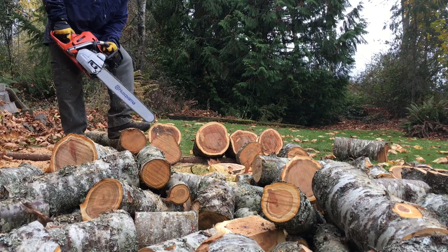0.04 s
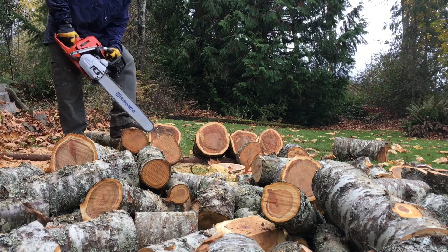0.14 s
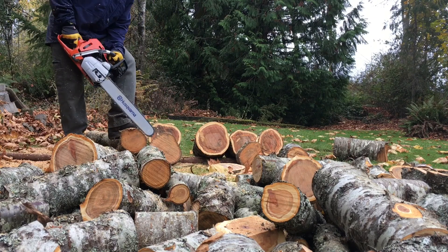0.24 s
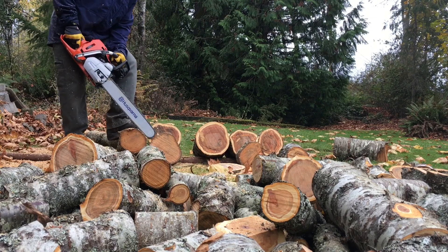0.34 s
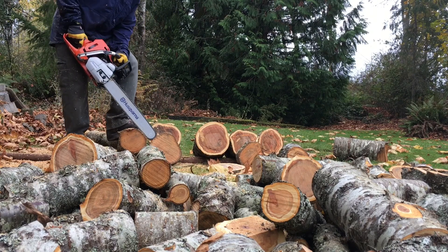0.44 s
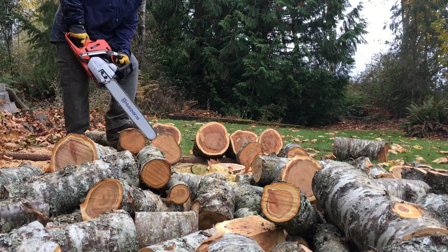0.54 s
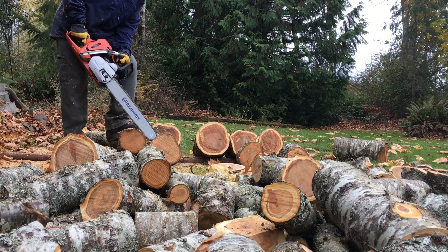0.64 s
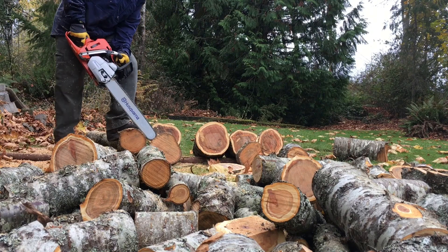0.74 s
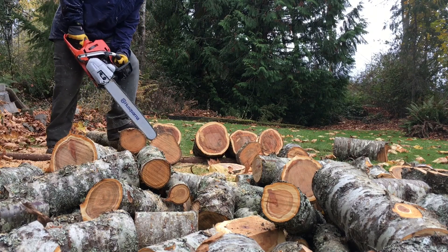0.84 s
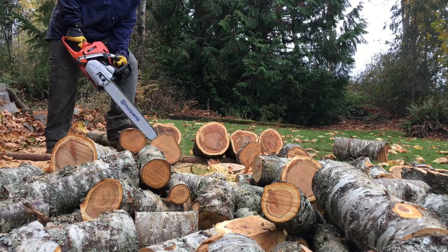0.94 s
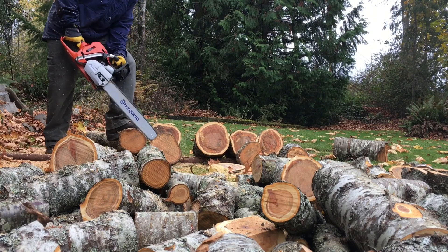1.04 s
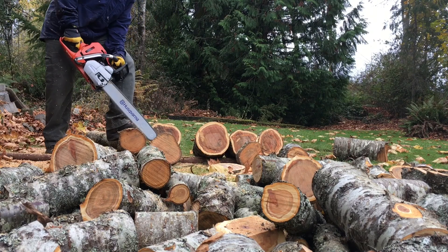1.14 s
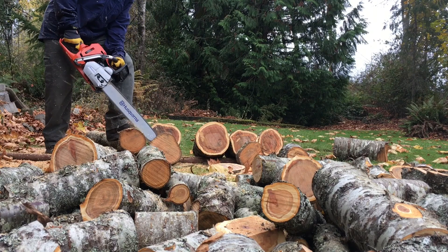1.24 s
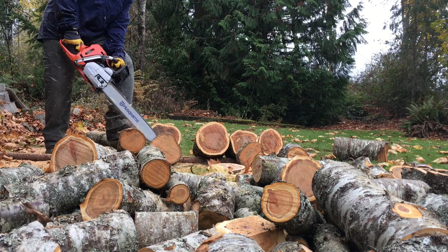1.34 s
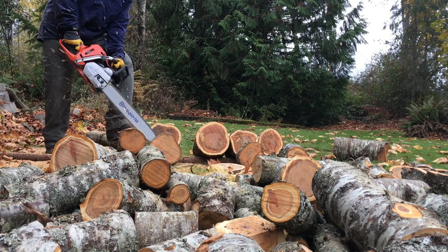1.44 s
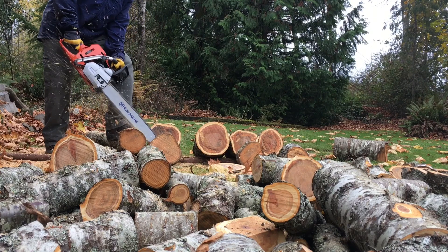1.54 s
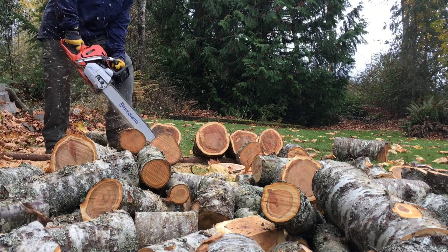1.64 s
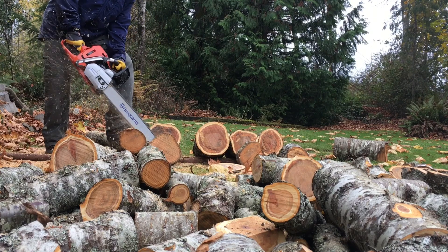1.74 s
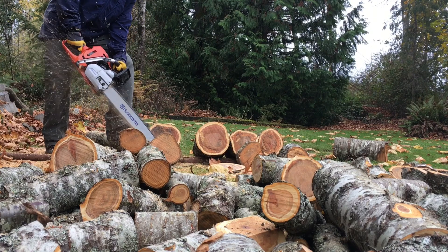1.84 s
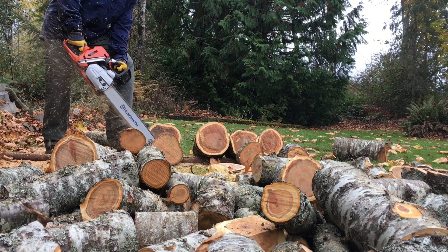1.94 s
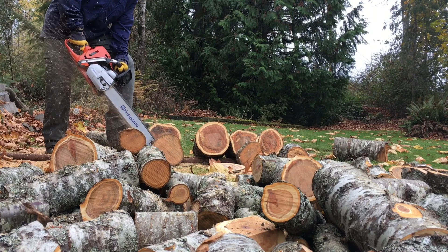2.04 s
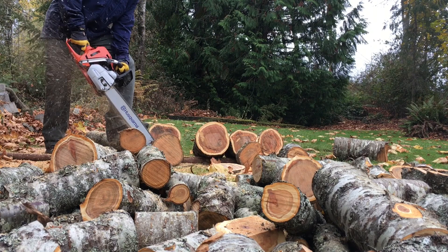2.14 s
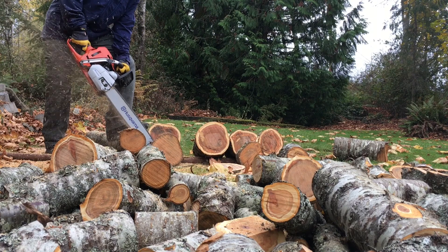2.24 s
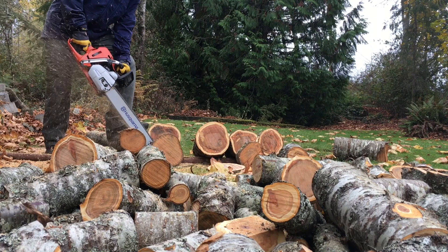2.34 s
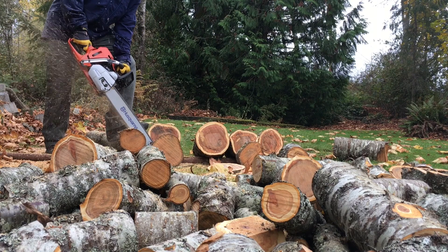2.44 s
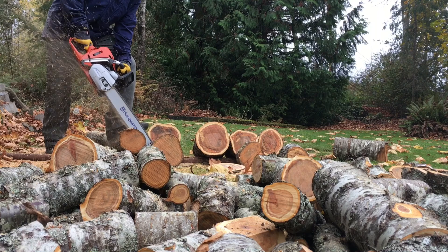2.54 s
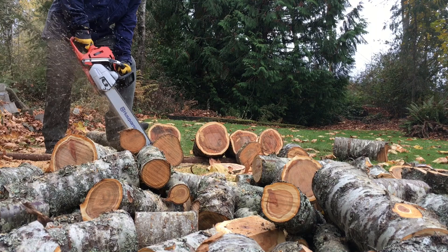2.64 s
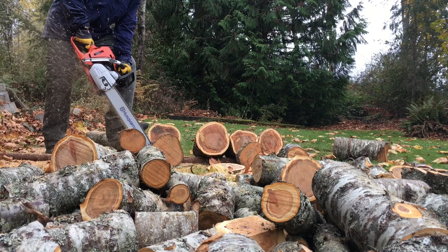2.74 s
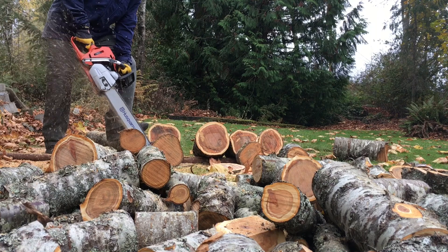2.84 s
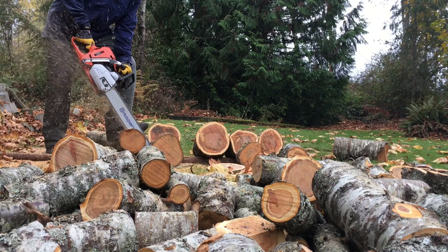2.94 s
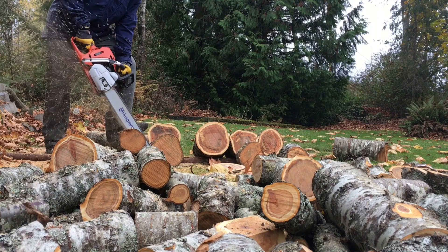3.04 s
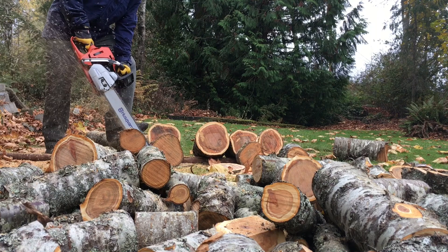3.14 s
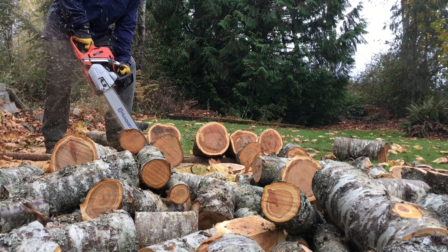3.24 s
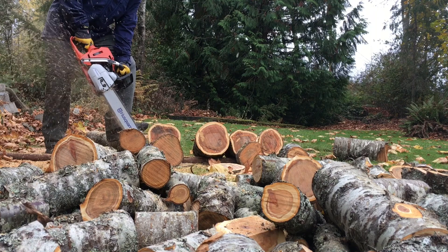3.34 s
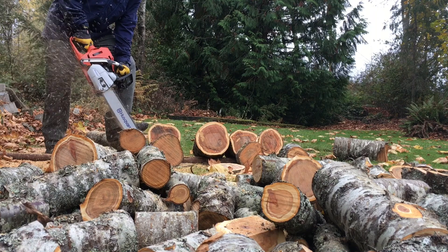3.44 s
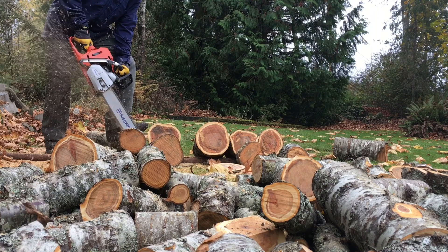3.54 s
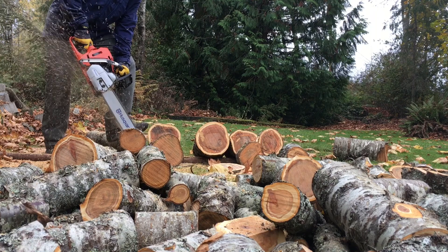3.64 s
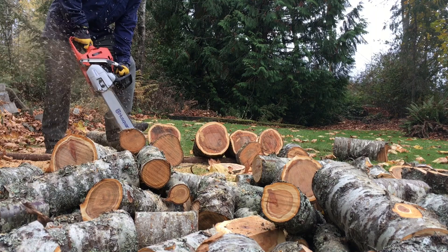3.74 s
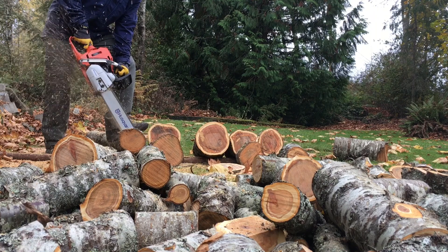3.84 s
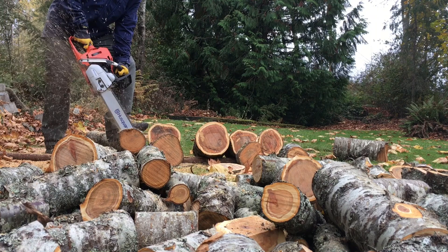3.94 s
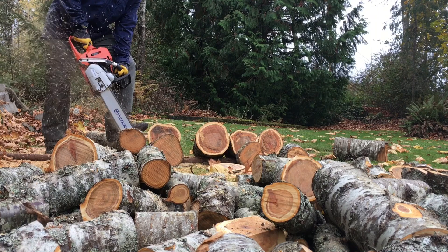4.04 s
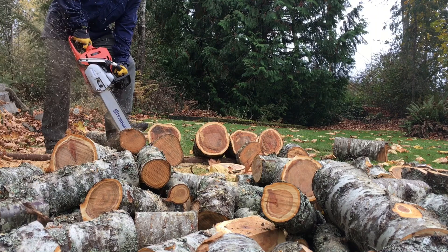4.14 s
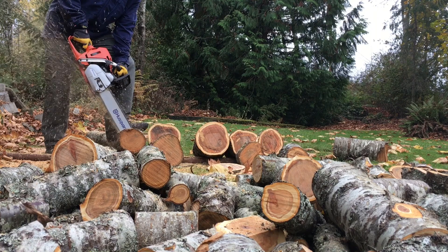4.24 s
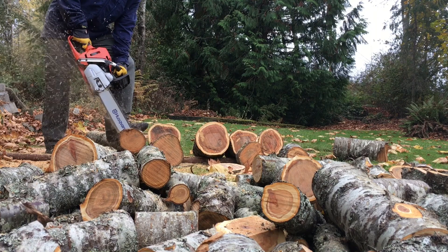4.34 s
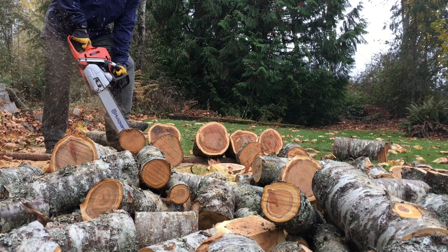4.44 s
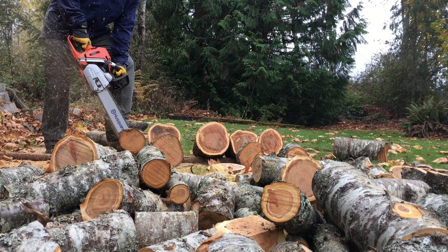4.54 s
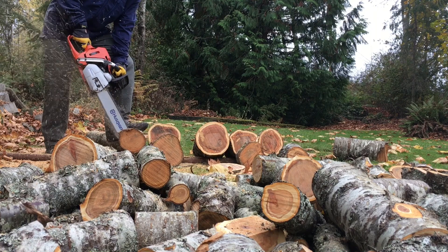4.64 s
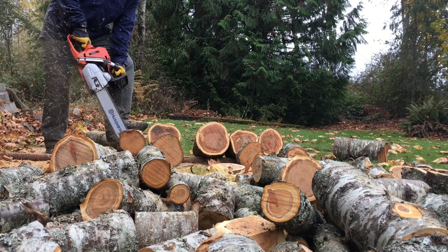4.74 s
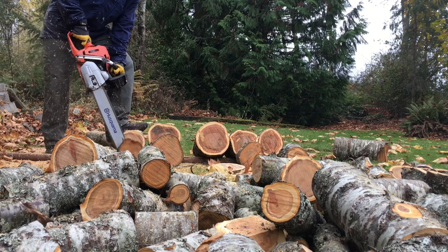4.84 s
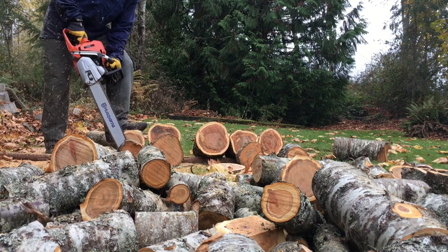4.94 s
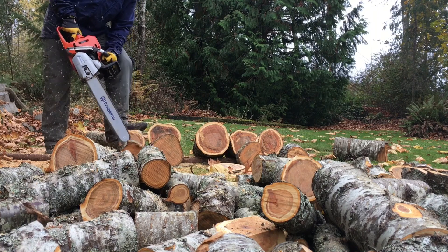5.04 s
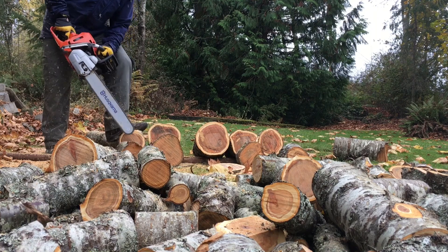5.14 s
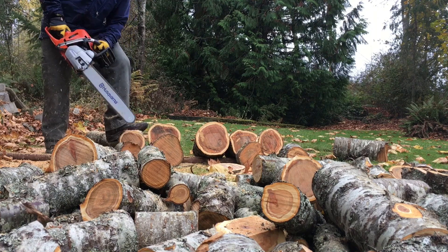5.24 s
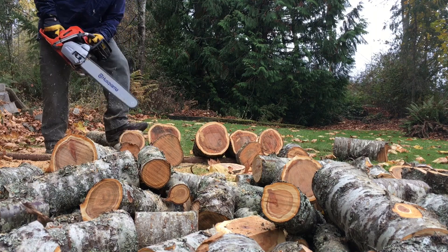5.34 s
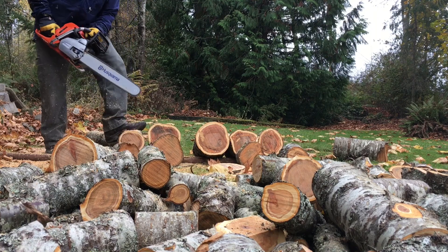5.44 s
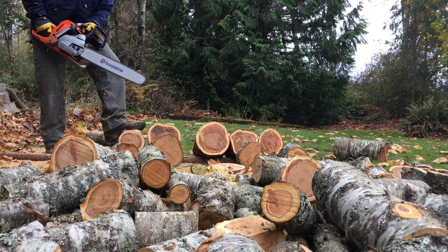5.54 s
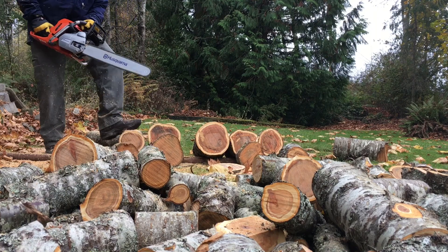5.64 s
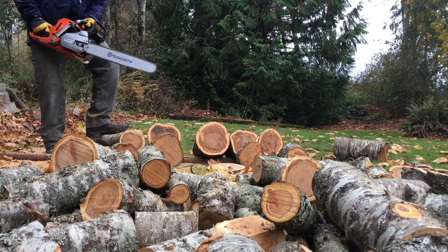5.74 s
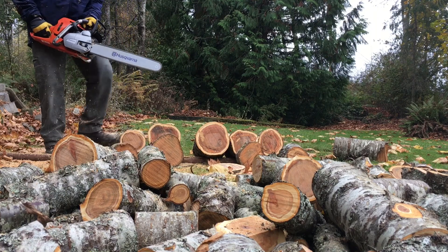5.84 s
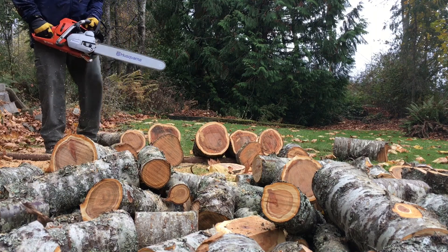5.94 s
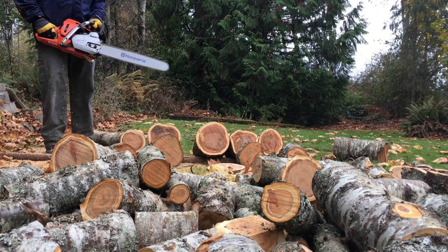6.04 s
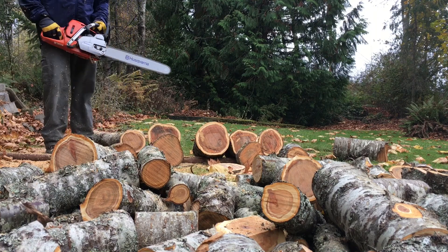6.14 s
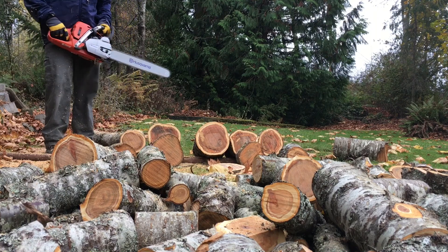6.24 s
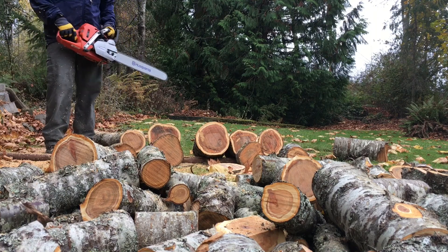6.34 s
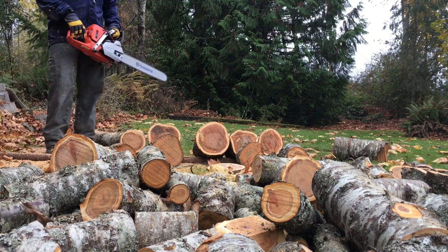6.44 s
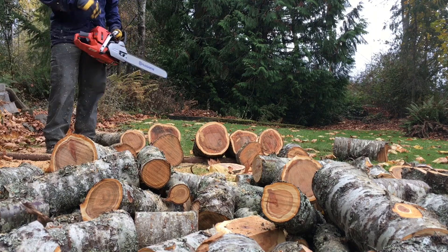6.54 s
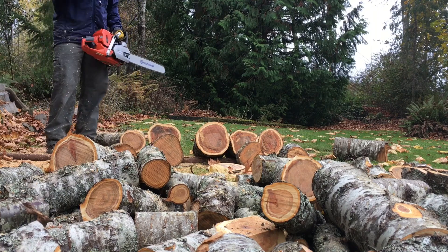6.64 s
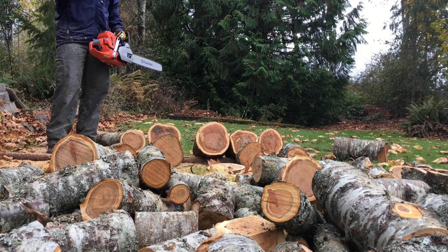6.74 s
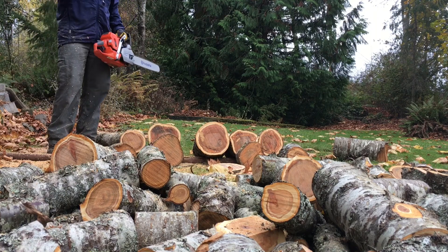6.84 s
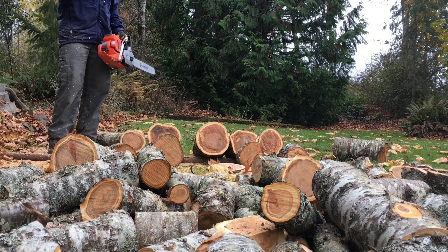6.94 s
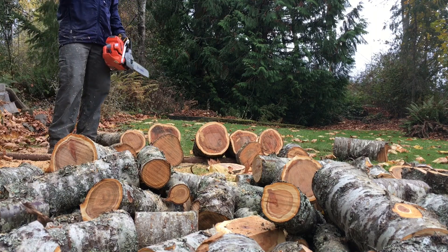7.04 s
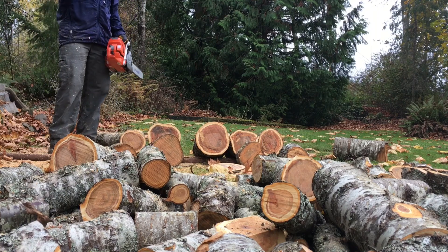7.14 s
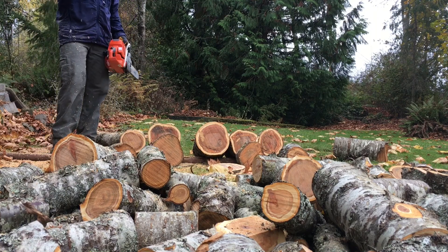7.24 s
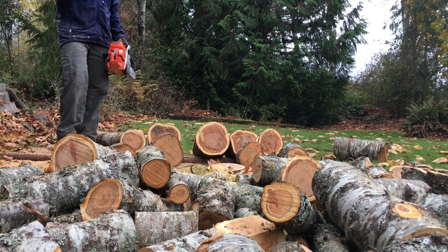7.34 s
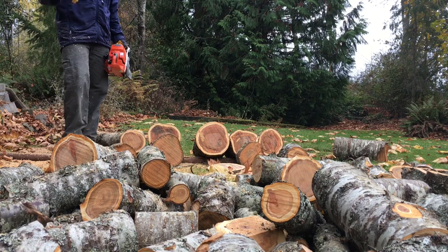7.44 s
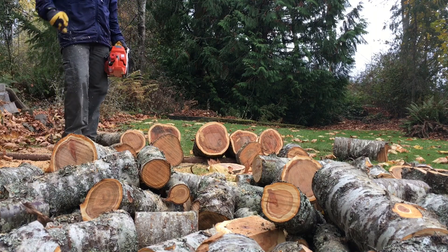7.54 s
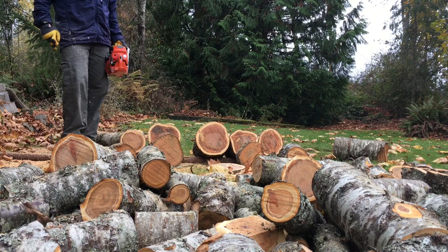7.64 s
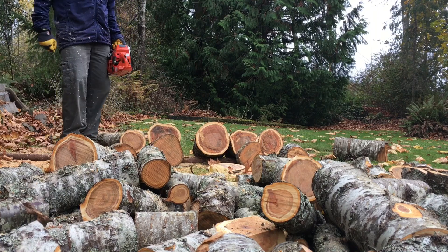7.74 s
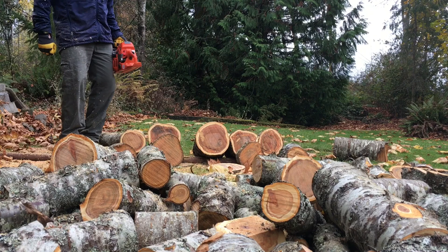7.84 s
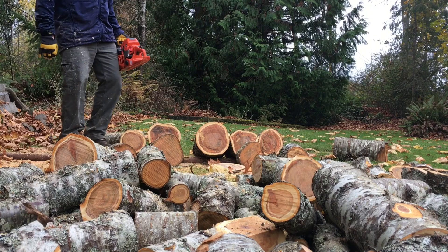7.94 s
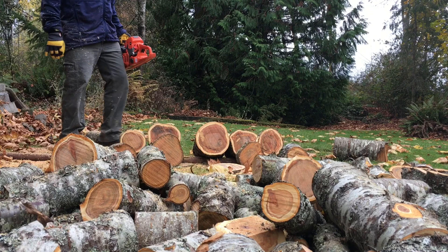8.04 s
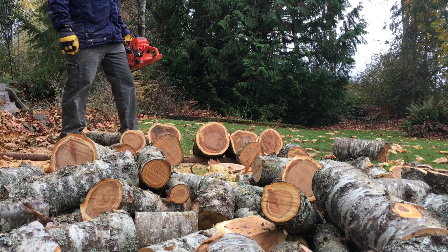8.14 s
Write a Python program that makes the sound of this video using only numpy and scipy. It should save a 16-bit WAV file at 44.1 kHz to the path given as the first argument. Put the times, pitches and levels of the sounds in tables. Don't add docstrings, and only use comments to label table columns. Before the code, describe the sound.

Close outdoor chainsaw: lumpy idle, sputtering throttle-up, loud steady high-speed cut with brief stutters, quick coast-down, then irregular popping idle moving off.

```python
import sys
import numpy as np
from scipy import signal
from scipy.fft import rfft, irfft, next_fast_len
from scipy.io import wavfile
from scipy.ndimage import uniform_filter1d, map_coordinates

SR = 44100
rng = np.random.default_rng(int(sys.argv[2]) if len(sys.argv) > 2 else 0)


def how_loud(loudness_db):
    steps = np.asarray(loudness_db, float) / 20
    return 10 ** steps


def persist_wave(psi):
    counts = np.round(np.clip(psi, -1, 1) * 32767).astype(np.int16)
    wavfile.write(sys.argv[1], SR, np.atleast_2d(counts).T)


N = 360719
TIME = np.arange(N) / SR

# [t/s, speed/turns per s]
CRANK_SPEED = [(0, 43.5), (.99, 43.5), (1.05, 78), (1.12, 89.7), (1.39, 98.8), (1.575, 167), (1.69, 200.8),
               (1.8, 216.3), (1.95, 221.3), (2.74, 221.2), (3.3, 218), (4.78, 219.5), (5.005, 232),
               (5.17, 169), (5.72, 79), (5.9, 67), (6.29, 54), (6.42, 43.5)]
# [start t/s, end t/s, loss level/dB]
LIMITER_SPELLS = [(2.07, 2.09, -7.5), (2.75, 2.854, -4.5), (3.437, 3.455, -8), (4.033, 4.163, -4),
                  (4.487, 4.517, -4.5), (4.784, 4.886, -5), (4.962, 4.996, -7)]
SAG_PER_DB, RECOVER_S = 24, .13
PULLED_S, FREED_S = 0.98, 5.0
PULL_S, RELEASE_S = 0.066, 0.061
# [t/s, level/dB]
THROTTLE_LEVEL = [(1.0, -16.5), (1.2, -12.5), (1.41, -11.5), (1.5, -7.5), (1.62, -8.5), (1.9, -12.5), (2.6, -14),
                  (5.0, -13.5)]
# [t/s, level/dB]
CARRIED_OFF = [
    (6.2, 0),
    (7.0, -1.5),
    (8.18, -2),
]

# [t/s, peak level/dB]
IDLE_POPS = [(0.015, -19), (0.085, -15.5), (0.152, -15.5), (0.195, -18.5), (0.262, -16.5), (0.327, -20),
             (0.35, -19), (0.416, -17), (0.506, -14.5), (0.593, -15), (0.658, -21), (0.682, -19),
             (0.728, -20), (0.773, -19), (0.817, -19.5), (0.865, -17.5), (0.933, -20.5)]
# [t/s, peak level/dB]
SPUTTER_POPS = [(1, -12.5), (1.019, -19), (1.035, -8.5), (1.047, -11.5), (1.06, -13), (1.071, -8.5),
                (1.095, -9.5), (1.117, -7.5), (1.14, -11), (1.161, -6.5), (1.183, -10), (1.225, -7),
                (1.26, -6), (1.311, -8.5), (1.335, -7.5), (1.363, -15.5), (1.393, -8), (1.413, -8),
                (1.432, -4.5)]
# [t/s, peak level/dB]
CATCHING_POPS = [(5.826, -9), (5.972, -9.5), (6.099, -12), (6.196, -15), (6.282, -16.5), (6.385, -20.5),
                 (6.445, -19), (6.53, -20), (6.611, -21.5), (6.671, -21), (6.736, -18), (6.824, -19.5),
                 (6.908, -19), (6.972, -20), (7.039, -21.5), (7.105, -21.5), (7.17, -22), (7.257, -23),
                 (7.322, -23), (7.389, -21.5), (7.454, -23), (7.541, -22), (7.609, -22), (7.696, -22.5),
                 (7.809, -24), (7.875, -24), (7.942, -23), (8.035, -27), (8.124, -23.5)]

# [f/Hz, width/Hz, level/dB]
COOL_MUFFLER = [(585, 365, -3), (780, 238, -0.5), (1463, 117, -9.5)]
# [f/Hz, width/Hz, level/dB]
HOT_MUFFLER = [(678, 146, -4), (893.5, 188, 1), (1130.4, 138, -0.5), (1600, 517, -8), (2970, 590, -12.5)]
# [f/Hz, width/Hz, level/dB]
MUFFLER_OUTLET = [(1413, 210, 0)]
# [f/Hz, width/Hz, level/dB]
CAN_THUD = [(120, 60, 0), (330, 110, -6)]
# [f/Hz, level/dB per Hz]
CRACK_SPECTRUM = [(1000, -54), (3000, -12), (6000, -5), (9600, 8.5), (13000, 4.5), (16000, 6)]
SHUT_PUFF_DB = -26.5
JET_S, LATE_S_PER_DB = .07, .00003
CRACK_DB, LEAN_DB = -2, -2.5
CRACK_AWAY, CRACK_OPEN_DB = 2.3, -1

# [f/Hz, width/Hz, level/dB]
AIR_BOX = [(183, 54, 0), (268, 75, -6.5)]
SHUT_THROB_DB, SHUT_THROB_GROWS = -26.5, 34
OPEN_THROB_DB, OPEN_THROB_GROWS = -.5, 15.5
FULL_SPEED = 220
GULP_DB, GULP_FADES_DB = -16, 0.9
GULP_OPEN_DB, GULP_FOLLOWS = 31, 1.4
# [f/Hz, width/Hz, level/dB]
INLET_COLUMN = [(275.4, 50, -5), (520, 660, -3.5)]
SLAM_DB, SLAM_FADES_DB, SLAM_TURN = -20.5, 0.2, 0.467
SLAM_OPEN_DB, SLAM_FOLLOWS = -1, 0.83

# [f/Hz, width/Hz, level/dB]
CASING_FRONT = [(1460, 210, -7.5), (2860, 440, -9), (4150, 640, -15.5), (5900, 210, -5),
                (9460, 1400, -11.5), (11030, 83, -2), (15000, 1500, -74)]
# [f/Hz, width/Hz, level/dB]
CASING_BACK = [(1630, 32, 1), (2720, 360, 0), (3400, 110, -14.5), (5620, 500, -8), (9160, 540, -3),
               (11100, 110, 0.5), (15500, 230, -25)]
SLAP_DB, SLAP_HOT_DB, SLAP_AWAY = -20, -4, 2.76

# [t/s, hiss level/dB]
CHAIN_HISS = [(.98, -50), (1.05, -27), (1.55, -17.5), (1.85, -22.5), (2.6, -23.5), (5.0, -24.5),
              (5.85, -26), (6.55, -36), (7.0, -47.5), (8.18, -50)]
# [f/Hz, level/dB per Hz]
HISS_SPECTRUM = [(250, -45), (600, -24), (1200, -11), (2100, -9), (3000, -2), (4800, -4), (6000, 0),
                 (7500, -3), (11000, -3), (15500, -5)]
# [multiple of the turn, level/dB]
BLADE_WHINE = [(12, -34), (14, -37.5), (15, -36), (20, -28), (27, -33.5), (28, -32), (31, -41)]

# [multiple of the turn, level/dB]
PORT_BEATS = [(2, -24), (3, -29), (4, -21.5)]
# [f/Hz, width/Hz, level/dB]
CRANKCASE = [(234, 190, -0.5)]
BREATH_OPEN_DB, BREATH_DROWNS_DB = 5.5, 0.2
BLUR_DB = 0.2

# [t/s, level/dB]
LOG_BITE = [
    (1.7, -62),
    (1.8, -54),
    (3, -59),
    (5.0, -50),
    (5.1, -68),
]
# [f/Hz, level/dB per Hz]
YARD_RUMBLE = [(15, -45), (28, -6), (52, 1), (110, 4), (160, -34), (300, -64)]


def unit(x):
    return x / np.sqrt(np.mean(x ** 2) + 1e-20)


def curve(rows):
    t, value = np.transpose(rows)
    return np.interp(TIME, t, value)


def wobble(rate):
    return map_coordinates(rng.standard_normal(int(N * rate / SR) + 4), [TIME * rate])


def filtered(x, response):
    m = next_fast_len(N + SR // 2)
    return irfft(rfft(x, m) * response(np.fft.rfftfreq(m, 1 / SR)), m)[:N]


def resonances(modes):
    def response(f):
        total = 0
        for k, (centre, width, db) in enumerate(modes):
            damping = 1j * f * width
            total = total + (-1) ** k * how_loud(db) * damping / (centre * centre - f * f + damping)
        return total
    return response


def ringing(x, modes, order=1, soft_hz=2500):
    response = lambda f: resonances(modes)(f) ** order / (1 + 1j * f / soft_hz)
    impulse = irfft(response(np.fft.rfftfreq(SR // 2, 1 / SR)))
    return filtered(x, response) / np.abs(impulse).max()


def noise(points):
    f, db = np.transpose(points)
    colour = lambda hz: how_loud(np.interp(np.log(hz + 1), np.log(f), db))
    return unit(filtered(rng.standard_normal(N), colour))


def pulses(times, sizes):
    at = np.asarray(times)[:, None] * SR
    index = np.floor(at) + np.arange(-7, 9)
    window = np.cos((index - at) * np.pi / 16) ** 2
    shape = np.sinc(index - at) * window * np.asarray(sizes)[:, None]
    return np.bincount(np.clip(index, 0, N).astype(int).ravel(), shape.ravel(), N + 1)[:N]


def bursts(times, sizes, t60):
    return np.abs(signal.lfilter([1], [1, -how_loud(-60 / (t60 * SR))], pulses(times, sizes)))


def shaft():
    t, speed = np.transpose(CRANK_SPEED)
    cut_db = sum(db * (TIME > start) * (TIME < end) for start, end, db in LIMITER_SPELLS)
    sag = signal.lfilter([SAG_PER_DB / SR], [1, -np.exp(-1 / (RECOVER_S * SR))], cut_db)
    moves = [PULLED_S, PULLED_S + PULL_S, FREED_S, FREED_S + RELEASE_S]
    trigger = np.interp(TIME, moves, [0, 1, 1, 0])
    return np.exp(np.interp(TIME, t, np.log(speed))) + sag, trigger


def firings():
    return np.transpose(IDLE_POPS + SPUTTER_POPS + CATCHING_POPS)


def crank(speed):
    fired = firings()[0]
    then = np.interp(fired, TIME, speed)
    kicks = bursts(fired, (then < 75) * (1. + (then > 52)), t60=.35)
    turns = np.cumsum(speed * (1 + .09 * kicks)) / SR
    free = np.interp(fired, TIME, turns)
    whole = np.cumsum(np.maximum(np.round(np.diff(free, prepend=free[0])), 1))
    turns = turns + uniform_filter1d(np.interp(TIME, fired, whole - free), size=SR // 16)
    return turns, np.interp(np.arange(1, int(turns[-1]) + 1), turns, TIME)


def spark_cuts(times):
    cut_db = np.zeros(len(times))
    for start, end, loss_db in LIMITER_SPELLS:
        first, last = np.searchsorted(times, [start - .002, end])
        cut_db[first:last] = loss_db * (np.arange(last - first) % 3 > 0) * 0.8
    return cut_db


def exhaust(turns, times, speed, trigger):
    fired, fired_db = firings()
    tracks = (speed, trigger, curve(THROTTLE_LEVEL), curve(CARRIED_OFF))
    speed, trigger, throttle_db, away_db = (np.interp(times, TIME, c) for c in tracks)
    cut_db = spark_cuts(times)
    heat = np.clip((speed - 60) / 110 + 0.22 * trigger, 0, 1)
    coasting = (1 - trigger) * np.clip((speed - 60) / 20, 0, 1)
    rich = trigger * (1 - heat)

    scatter_db = 2.2 * (1 - heat) * (1 - coasting) + .3
    shut_db = SHUT_PUFF_DB + away_db + 4.3 * coasting
    puff_db = trigger * throttle_db + (1 - trigger) * shut_db + cut_db
    puff_db = puff_db + scatter_db * rng.standard_normal(len(times))
    turn = np.round(np.interp(fired, TIME, turns)).astype(int) - 1
    puff_db[turn] = fired_db
    size = how_loud(puff_db)

    opened = times - .0007 - LATE_S_PER_DB * cut_db
    pops = ringing(pulses(opened, size * (1 - heat)), COOL_MUFFLER, order=2)
    pops += ringing(pulses(opened, size * heat), HOT_MUFFLER, order=2)
    pops += ringing(pulses(opened, size * rich * how_loud(-5.5)), MUFFLER_OUTLET, order=2)
    thud_size = size * how_loud(1.5 - 15.4 * heat - 7.1 * coasting)
    thuds = ringing(pulses(times, thud_size), CAN_THUD, soft_hz=385)
    jet = bursts(times, size * how_loud(-7.5 - 22.3 * heat + 4.4 * rich), t60=JET_S)
    jet = jet * noise([(250, -3.5), (520, -0.5), (850, 14.0), (1500, -9.0), (4000, -4.5), (16000, -44)])

    lean = np.clip(3 - np.diff(turn, prepend=-3), 0, 3)
    crack_db = CRACK_DB + LEAN_DB * lean + CRACK_AWAY * away_db[turn] + CRACK_OPEN_DB * trigger[turn]
    crack_db = crack_db - 12 * coasting[turn] + rng.standard_normal(len(turn))
    crack = bursts(fired + 0.00068, how_loud(fired_db + crack_db + 2), t60=0.019)
    crack = uniform_filter1d(crack, size=90) * noise(CRACK_SPECTRUM)
    return pops - thuds + jet + crack


def intake(turns, times, speed, trigger):
    throttle_db = curve(THROTTLE_LEVEL)
    gulp_db = GULP_DB - GULP_FADES_DB * np.maximum(speed - 52, 0)
    gulp_db = gulp_db + trigger * (GULP_OPEN_DB + GULP_FOLLOWS * throttle_db) + 2.3 * curve(CARRIED_OFF)
    gulp_db = np.interp(times, TIME, gulp_db) + 2.2 * rng.standard_normal(len(times))
    gulps = ringing(pulses(times - .0004, how_loud(gulp_db)), AIR_BOX, order=2, soft_hz=900)

    decades = np.log10(speed / FULL_SPEED)
    stumble = how_loud(0.47 * np.interp(TIME, times - .0012, spark_cuts(times)))
    driven = trigger ** 2 * how_loud(throttle_db + OPEN_THROB_DB + OPEN_THROB_GROWS * decades) * stumble
    closed = (1 - trigger) * how_loud(SHUT_THROB_DB + SHUT_THROB_GROWS * decades)
    throb = np.sqrt(2) * (driven + closed) * np.sin(2 * np.pi * (turns - .15))
    return throb + gulps


def inlet_slam(turns, speed, trigger):
    times = np.interp(np.arange(int(turns[-1])) + SLAM_TURN, turns, TIME)
    slam_db = SLAM_DB - SLAM_FADES_DB * speed + 0.3 * curve(CARRIED_OFF)
    slam_db = slam_db + trigger * (SLAM_OPEN_DB + SLAM_FOLLOWS * curve(THROTTLE_LEVEL))
    slam_db = np.interp(times, TIME, slam_db) + 2.4 * rng.standard_normal(len(times))
    return ringing(pulses(times, how_loud(slam_db)), INLET_COLUMN, order=2, soft_hz=890)


def clatter(turns, speed):
    times = np.interp(np.arange(1, int(turns[-1])) - .32, turns, TIME)
    slap_db = SLAP_DB + SLAP_HOT_DB * speed / FULL_SPEED + SLAP_AWAY * curve(CARRIED_OFF)
    slap_db = np.interp(times, TIME, slap_db) + 1.6 * rng.standard_normal(len(times))
    rattle = bursts(times, how_loud(slap_db), t60=0.049) * rng.standard_normal(N)
    swung = np.interp(TIME, [6.2, 7.0], [0, 1])
    front = filtered(rattle * (1 - swung), resonances(CASING_FRONT))
    back = filtered(rattle * swung, resonances(CASING_BACK))
    return how_loud(8) * (front + back)


def chain(turns, speed):
    jerk = 1 + 0.11 * np.cos(2 * np.pi * (turns - .1))
    hiss_db = curve(CHAIN_HISS) + 0.99 * wobble(9) + 0.18 * wobble(60)
    hiss = how_loud(hiss_db) * jerk * noise(HISS_SPECTRUM)

    whine = np.zeros(N)
    looseness = 0.69 * (1 + 3.1 * (TIME > FREED_S))
    for k, db in BLADE_WHINE:
        cover = 1 + (3.2 + 5 * (TIME > 5.12)) / (1 + ((k * speed - 2760) / 70) ** 2)
        tone = np.sin(2 * np.pi * k * turns + looseness * wobble(35))
        whine += how_loud(db + 1.2 * wobble(3.694)) * cover * tone
    slack_db = np.interp(TIME, [5.03, 5.1, 5.27, 5.35], [0, -11, -6, -22])
    return hiss + whine * how_loud(slack_db) * (speed / 220) ** 2


def ground(x, gain, spacing_hz, shift):
    return filtered(x, lambda f: 1 + gain * np.exp(-2j * np.pi * (f / spacing_hz - shift)))


def trees(x, t60):
    t = np.arange(SR // 2) / SR
    tail = rng.standard_normal(len(t)) * how_loud(-60 * t / t60) * (t > .004)
    thin = filtered(x, lambda f: (1j * f / (450 + 1j * f)) ** 2)
    return signal.fftconvolve(thin, tail / np.linalg.norm(tail))[:N]


def breathing(turns, speed, trigger):
    open_db = BREATH_OPEN_DB + 1.77 * (curve(THROTTLE_LEVEL) - THROTTLE_LEVEL[-1][1])
    open_db = open_db - BREATH_DROWNS_DB * np.maximum(speed - 150, 0)
    level_db = trigger * open_db + wobble(20)
    hum = np.zeros(N)
    for k, db in PORT_BEATS:
        beat_db = db - BLUR_DB * (k - 2) * np.maximum(speed - 70, 0)
        cavity = np.abs(resonances(CRANKCASE)(k * speed)) ** 2
        hum += how_loud(beat_db) * cavity * np.sin(2 * np.pi * k * (turns - .1))
    return hum * how_loud(level_db) * np.clip((speed - 48) / 10, 0, 1)


def log_and_yard():
    shudder = how_loud(5) * np.sin(2 * np.pi * 49.5 * TIME + 1.1 * wobble(3.25))
    return how_loud(curve(LOG_BITE)) * (how_loud(-2.5) * noise(YARD_RUMBLE) + shudder)


def scene():
    speed, trigger = shaft()
    turns, times = crank(speed)
    saw = exhaust(turns, times, speed, trigger) + intake(turns, times, speed, trigger)
    saw += inlet_slam(turns, speed, trigger)
    metal = clatter(turns, speed) + chain(turns, speed)
    saw += ground(metal, gain=0.12, spacing_hz=2830, shift=0.19)
    saw += breathing(turns, speed, trigger)
    heard = saw + how_loud(-9.0) * trees(saw, t60=0.21) + log_and_yard()
    return np.array([heard, heard])


def band_limit(x):
    return signal.sosfilt(signal.butter(12, 16500, fs=SR, output="sos"), x)


def record(dry):
    held = dry[0] / (1 + np.abs(dry[0]) ** 8) ** (1 / 8)
    held = filtered(held, lambda hz: hz < 15850)
    return band_limit(np.array([held, held]))


dry = scene()
out = record(dry)
persist_wave(out)
```